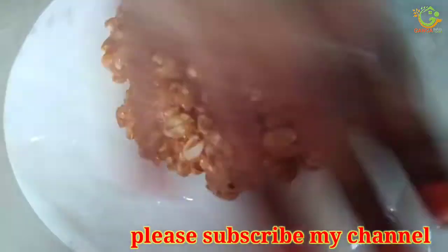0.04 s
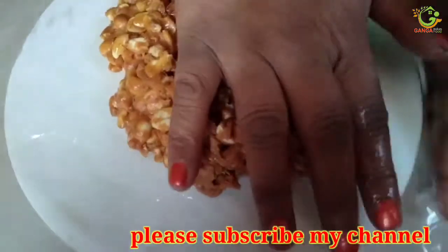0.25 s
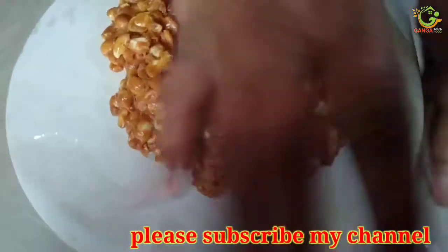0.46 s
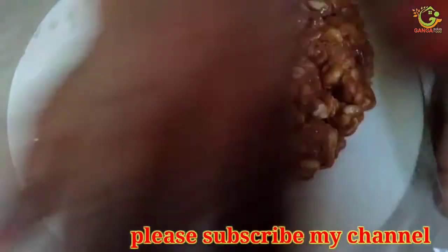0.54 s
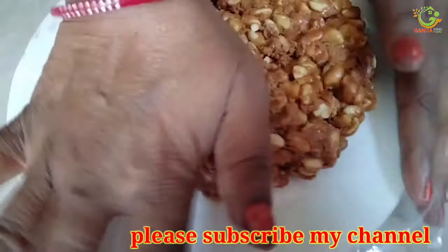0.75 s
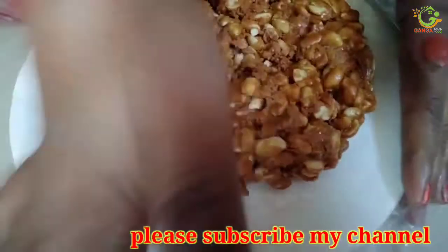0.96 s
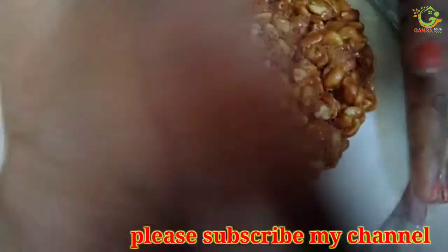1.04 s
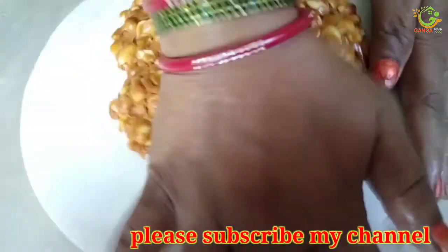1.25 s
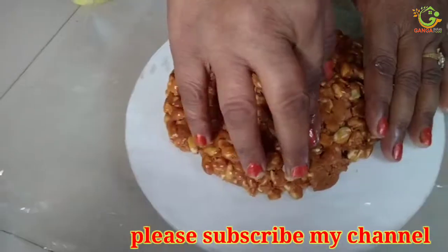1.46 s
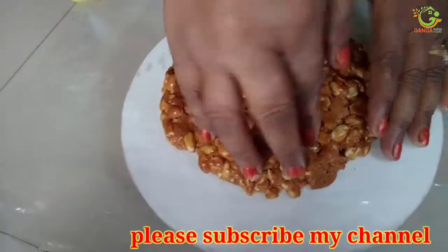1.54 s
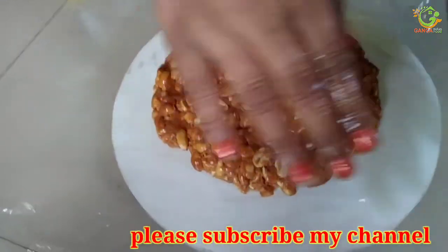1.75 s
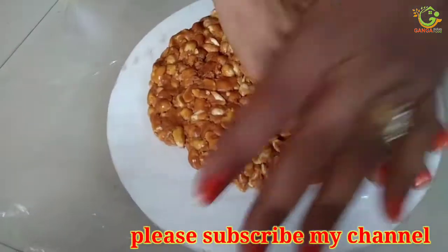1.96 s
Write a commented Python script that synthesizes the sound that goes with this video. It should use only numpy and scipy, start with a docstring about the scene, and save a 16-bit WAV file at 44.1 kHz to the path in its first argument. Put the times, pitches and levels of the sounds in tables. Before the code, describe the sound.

A sticky mass of peanuts and sugar crackles as hands press it flat several times. Bangles click midway, then the plate knocks dully twice as the presses soften. The microphone is close, in a small kitchen with low hum.

```python
"""Pressing peanuts and sugar

Close microphone on a plate in a small kitchen, where hands press a warm mass of peanuts and sticky sugar flat.
Each press crackles as sugar threads snap and skin peels off; a nut cracks, bangles click and the plate knocks
dully on the counter twice. Behind them lie air and hiss, with a low hum and rumble; the background drops
suddenly near 1.5 s, and the last pats are quieter."""
import sys
import numpy as np
from scipy import signal
from scipy.fft import rfft, irfft
from scipy.io import wavfile

SR = 44100
rng = np.random.default_rng(int(sys.argv[2]) if len(sys.argv) > 2 else 0)


def store_pcm(level_fs):
    """Save levels as 16-bit WAV."""
    pcm = np.round(np.clip(level_fs, -1, 1) * 32767).astype(np.int16)
    wavfile.write(sys.argv[1], SR, np.atleast_2d(pcm).T)


N = 88200

# sugar threads snapping: start_s, relative_db, treble_db, decay_ms
SUGAR_SNAPS = [(0.165,-29,-14,2.9),(.170,-30.5,-7,1.7),(0.214,-29.5,-18,2.7),(0.25,-22.5,-6,1.8),(0.2547,-18.5,1,4.3),(0.263,-18,-14,2.7),(.267,-13,0.5,2.1),(.2795,-14,-5,3.5),(0.2894,-15.5,-7,3),
               (0.3032,-7.5,-4.5,0.74),(.307,-12.5,-5.5,0.99),(0.32,-18,2,2.5),(0.3424,-20,-1,1.5),(.347,-15,-1,1.7),(0.3607,-13,-7,5.3),(0.3665,-8,3,1.7),(.376,-11.5,2,1.5),
               (.3875,-19,-9,4.5),(0.3946,-23,-5,1.2),(0.417,-22,-4,2.9),(0.437,-20,-14,2.4),(.464,-19.5,-6,3),(0.49,-18.5,0.5,7.4),(0.506,-21.5,-7,0.42),
               (.529,-22.5,2,1.5),(0.534,-21.5,-4,1.2),(0.541,-20.5,0,2.4),(0.5512,-23,-7.5,1.3),(0.6263,-25.5,-15,1.8),(0.6782,-14.5,-1,3.5),(0.6858,-15,-2.5,4.3),
               (0.6991,-22,-27,1.5),(0.7163,-22,-4,1.8),(0.7188,-14,-0.5,1.1),(0.7378,-11,-0.5,4.7),(.747,-17.5,-0.5,1.6),(.7545,-26,-11,1.1),(.763,-35,-5,1.8),(0.7733,-12.5,1,1.6),(.783,-35,2,2.3),(.7895,-21.5,-1,1.2),(0.7931,-10,5,2),
               (0.8165,-18.5,5,4.8),(0.8256,-13.5,1.5,0.85),(0.855,-27,-9,3),(0.9026,-16,6,2),(0.9093,-13,-0.5,8.6),(0.918,-15,1,2),(0.919,-12,3.5,3.1),(.927,-15.5,19,2),(.932,-13.5,5,1.2),
               (0.9444,-19,10,3),(.971,-15,-1,0.91),(0.9754,-18,20,1.3),(0.9893,-18.5,15,1),(0.9969,-17.5,12,1.5),(1,-20,-1,3.2),(1.054,-26.5,-15,1.5),
               (1.209,-25.5,-11.5,6.7),(1.228,-26.5,3,1.3),(1.262,-32.5,5,1.1),(1.3375,-17.5,0,1.4),(1.342,-21,-11,4),(1.349,-9,1.5,1.7),(1.354,-10,6,1.6),(1.36,-7.5,14,2.7),(1.371,-16,12,1.5),
               (1.377,-24,8,1.2),(1.413,-24,6,1.1),(1.4258,-16,5,2.3),(1.433,-16.5,4,1.2),(1.440,-20,11,0.99),(1.451,-13.5,4.5,2),(1.455,-14.5,4.5,1.6),
               (1.5055,-37,-28,0.78),(1.517,-28.5,-4.5,3),(1.533,-38,-17,5.5),(1.548,-31,-7,2.4),(1.598,-34,1,2.5),(1.7544,-27,8.5,1.4),(1.828,-39.5,-4,1.5),(1.893,-42,-11,1.8),(1.935,-45,-12,1.5)]
# tone of breaking sugar: frequency_hz, gain_db
SUGAR_COLOUR = [(100,-27.5),(400,-18),(800,-14.5),(1400,-8.5),(2200,-11),(3200,-28.5),(4000,-16),(4900,-11.5),(6300,-18),(7300,-7),(8300,2.5),(9600,-5.5),(12300,-13.5),(15000,-9.5),(16000,-17)]
# crackle and friction as the palm bears down: time_s, relative_db
PRESS_LEVEL = [(0,-48),(.235,-39),(.27,-25.5),(.38,-26),(.44,-36),(.53,-34),(.6,-48),(.67,-53),(.69,-29),(.75,-25.5),(.84,-43.5),(.895,-41),(.92,-31.5),(1.01,-30),(1.05,-44.5),(1.19,-52),(1.24,-47),(1.33,-41),(1.352,-16.5),(1.40,-38),(1.45,-30.5),(1.481,-42),(1.49,-57),(2,-65)]
# tone of the palm's friction: frequency_hz, gain_db
RUB_COLOUR = [(80,-16.5),(170,-6.5),(300,-1),(480,-10.5),(800,-1),(1400,0.5),(2200,-0.5),(3100,-10.5),(4800,-9),(6500,-12),(12000,1)]
# a finger sliding on the plate: time_s, level_db
SQUEAK_LEVEL = [(1.262,-69),(1.274,-50),(1.305,-48),(1.318,-42),(1.335,-65)]
# the plate knocks and rocks: start_s, relative_db, tilt_db_per_octave
PLATE_KNOCKS = [(1.3843,-15,-3),(1.3856,-18.5,20),(1.712,-15.5,-1),(1.7146,-31.5,13)]
# modes of the loaded plate: pitch_hz, relative_db, t60_s
PLATE_MODES = [(618,-4,0.023),(856,2.5,0.027),(1070,0,0.019),(1378,0,0.026),(1740,-2.5,.015),(1987,-4.5,0.032),(2750,-19.5,0.012),(4140,-19,0.018)]
# a knock coming back off the near walls: delay_s, gain_db
WALL_ECHOES = [(.0165,-5),(.0325,-16),(.05,-25)]
# modes of the cracking nut: pitch_hz, level_db, t60_s
NUT_MODES = [(1730,-27,0.017),(1833,-10.5,0.018),(2215,-13.5,0.019)]
# bangles touching: start_s, level_db, treble_db, decay_ms
BANGLE_CLICKS = [(1.0781,-21,-2.5,1.26),(1.2129,-20,18,1.5),(1.2168,-21,15.5,1.3)]
# tone of a bangle click: frequency_hz, gain_db
CLICK_COLOUR = [(200,-31),(1000,-26),(2200,-2.5),(3200,-36),(4800,-21.5),(6400,-18),(7600,3.5),(9200,-3.5),(12000,-10),(15000,-7.5),(16000,-6.5)]
# kitchen air, sinking away: time_s, level_db
ROOM_AIR_LEVEL = [(0,-38.5),(.4,-37),(.8,-40.5),(1.15,-42.5),(1.47,-43.5),(1.495,-52),(1.75,-48),(2,-53)]
# tone of the air: frequency_hz, gain_db
ROOM_AIR_COLOUR = [(100,-4.5),(150,12.5),(200,2),(260,2),(480,-4.5),(800,-2),(1300,-4),(2100,-1.5),(2900,-12.5),(3700,-15),(5000,-18),(8300,-21),(15500,-53)]
# treble hiss, swelling and fading: time_s, level_db
TREBLE_HISS_LEVEL = [(0,-47.5),(.2,-59),(.6,-46),(1.15,-56),(1.3,-45.5),(1.47,-30),(1.495,-60),(1.7,-55),(2,-57.5)]
# tone of the hiss: frequency_hz, gain_db
TREBLE_HISS_COLOUR = [(2500,-28),(3700,-30),(5000,3.5),(6500,-7),(8300,9.5),(10500,-0.5),(13000,-16),(15500,-1)]
# steady low room tone: frequency_hz, gain_db
ROOM_TONE_COLOUR = [(70,-38.5),(110,-4),(150,0.5),(200,-4.5),(320,-3),(500,-20.5),(1000,-59),(4000,-98)]
# low rumble, dropping near 1.5 s: time_s, level_db
LOW_RUMBLE_LEVEL = [(0,-32),(.25,-34.5),(.45,-38),(.7,-33.5),(.9,-40.5),(1.1,-39),(1.22,-42),(1.47,-36),(1.495,-53.5),(2,-53.5)]
# tone of the rumble: frequency_hz, gain_db
LOW_RUMBLE_COLOUR = [(10,-2),(16,8.5),(30,-7),(50,5.5),(70,-3.5),(95,-14),(145,-8.5),(200,-16),(300,-29.5),(600,-46.5)]
# tones of a humming appliance: pitch_hz, relative_db
APPLIANCE_TONES = [(63,-2.5),(210.5,-8.5)]
# rise and fall of the hum: time_s, level_db
APPLIANCE_LEVEL = [(0,-39),(.26,-32.5),(.4,-39),(.7,-35.5),(1.1,-45),(1.45,-51),(1.52,-65),(2,-50.5)]

SNAP_DB, GRAIN_DB, RUB_DB, BANGLE_TAIL_DB, ROOM_TONE_DB = -12.5, -3, -6.5, -8, -53
CRACKLE_ROOM_DB, KNOCK_ROOM_DB, NUT_ROOM_DB = -9.5, -7, -8
CRACKLE_T60_S, ROOM_T60_S, BANGLE_T60_S = 0.23, 0.35, 0.26
SNAP_BODY_LOSS, BANGLE_BODY_LOSS = 0.47, 0.54  # dB of body lost per dB of treble lift
BODY_FADE_HZ, TREBLE_RISE_HZ = (2420, 6600), (7300, 11600)


def sugar_snaps():
    """Each snap is an avalanche of tiny ruptures; the brighter it is, the less body it has."""
    out = np.zeros(N)
    for start_s, db, treble_db, decay_ms in SUGAR_SNAPS:
        tone = thinned(SUGAR_COLOUR, SNAP_BODY_LOSS * treble_db)
        snap = unit_rms(colour(avalanche(decay_ms), tone, treble_db))
        add(out, start_s, from_db(db + SNAP_DB) * snap)
    return out


def fine_crackle(grains_per_s=3500):
    """Countless small sugar threads part while the hand bears down."""
    grains = impulses(N, max_db=15) * (rng.random(N) < grains_per_s / SR)
    return from_db(GRAIN_DB) * level(PRESS_LEVEL) * unit_rms(colour(grains, SUGAR_COLOUR, treble_db=-8))


def palm_rub():
    """Friction of the palm, following the pressure."""
    return from_db(RUB_DB) * level(PRESS_LEVEL) * noise(RUB_COLOUR)


def plate_knocks(low_hz=462, high_hz=2740, echo_band_hz=(720, 970)):
    """The loaded plate bumps the counter; its damped ring comes back from the walls."""
    direct, t = np.zeros(N), np.arange(SR // 4) / SR
    pivot_hz = PLATE_MODES[3][0]
    for start_s, db, tilt_db in PLATE_KNOCKS:
        for k, (hz, mode_db, t60_s) in enumerate(PLATE_MODES):
            envelope_db = db + mode_db + tilt_db * np.log2(hz / pivot_hz) - 60 * t / t60_s
            add(direct, start_s, (-1) ** k * from_db(envelope_db) * np.sin(2 * np.pi * hz * t))
    direct = cut(direct, low_hz, "high", order=4)
    direct = cut(direct, high_hz, "low", order=5)
    out = direct + from_db(KNOCK_ROOM_DB) * room(direct, ROOM_T60_S)
    echo = cut(direct, echo_band_hz, "band", order=1)
    for delay_s, db in WALL_ECHOES:
        add(out, delay_s, from_db(db) * echo)
    return out


def nut_crack(start_s=0.915, low_hz=1000):
    """A nut gives under the heel of the hand with one short, woody ring."""
    direct, t = np.zeros(N), np.arange(SR // 10) / SR
    for hz, db, t60_s in NUT_MODES:
        add(direct, start_s, from_db(db - 60 * t / t60_s) * np.sin(2 * np.pi * hz * t))
    direct = cut(direct, low_hz, "high")
    return direct + from_db(NUT_ROOM_DB) * room(direct, ROOM_T60_S)


def bangles():
    """Bangles touch in thin, bright clicks with a smooth, airy tail."""
    out, t = np.zeros(N), np.arange(SR // 3) / SR
    for start_s, db, treble_db, decay_ms in BANGLE_CLICKS:
        tone = thinned(CLICK_COLOUR, BANGLE_BODY_LOSS * treble_db)
        click = unit_rms(colour(avalanche(decay_ms), tone, treble_db))
        tail = unit_rms(colour(rng.standard_normal(len(t)), CLICK_COLOUR, treble_db))
        add(out, start_s, from_db(db) * click)
        add(out, start_s, from_db(db + BANGLE_TAIL_DB - 60 * t / BANGLE_T60_S) * tail)
    return out


def finger_squeak(pitch_hz=5020, flutter_hz=78):
    """Skin slides on the plate with a faint, thin, fluttering tone."""
    t = np.arange(N) / SR
    sliding = (t > SQUEAK_LEVEL[0][0]) & (t < SQUEAK_LEVEL[-1][0])
    squeak = unit_rms(waver(flutter_hz) * np.sin(2 * np.pi * pitch_hz * t))
    return level(SQUEAK_LEVEL) * sliding * squeak


def room_air():
    """The kitchen behind the plate: soft air, treble hiss and a steady low tone."""
    air = level(ROOM_AIR_LEVEL) * noise(ROOM_AIR_COLOUR)
    hiss = level(TREBLE_HISS_LEVEL) * noise(TREBLE_HISS_COLOUR)
    return air + hiss + from_db(ROOM_TONE_DB) * noise(ROOM_TONE_COLOUR)


def appliance_hum(waver_db=0.5, waver_hz=24):
    """An appliance hums on two low tones, each wavering slightly in level."""
    hum, t = np.zeros(N), np.arange(N) / SR
    for hz, db in APPLIANCE_TONES:
        gain = from_db(db + waver_db * waver(waver_hz))
        hum += gain * np.sin(2 * np.pi * (hz * t + rng.random()))
    return np.sqrt(2) * level(APPLIANCE_LEVEL) * hum


def rumble():
    """Deep noise that drops abruptly near 1.5 s."""
    return level(LOW_RUMBLE_LEVEL) * noise(LOW_RUMBLE_COLOUR)


def room(x, t60_s, build_s=0.0067):
    """Diffuse reflections of the small kitchen build up and die away."""
    t = np.arange(SR // 2) / SR
    tail = rng.standard_normal(len(t)) * from_db(-60 * t / t60_s) * (1 - np.exp(-t / build_s))
    return signal.fftconvolve(x, tail / np.linalg.norm(tail))[:N]


def avalanche(decay_ms, samples=1536):
    """Tiny impulses that swell and die within milliseconds."""
    ms = 1000 * np.arange(samples) / SR
    rise_ms = 0.4 * decay_ms
    return impulses(samples, max_db=12) * (1 - np.exp(-ms / rise_ms)) * np.exp(-ms / decay_ms)


def impulses(count, max_db, spread_db=3):
    """Impulses of either sign, mostly small with a few large ones."""
    return rng.choice([-1, 1], count) * from_db(np.minimum(rng.exponential(spread_db, count), max_db))


def thinned(points, loss_db):
    """A colour with less low body."""
    return [(hz, db - loss_db * np.interp(hz, BODY_FADE_HZ, [1, 0])) for hz, db in points]


def colour(x, points, treble_db=0):
    """Minimum-phase filter through frequency_hz, gain_db points, with a treble shelf."""
    n = 2 * len(x)
    bins_hz = np.maximum(np.arange(n // 2 + 1) * SR / n, 1)
    hz, db = np.transpose(points)
    curve_db = np.interp(np.log(bins_hz), np.log(hz), db)
    shelf_db = treble_db * np.interp(bins_hz, TREBLE_RISE_HZ, [0, 1])
    cepstrum = irfft(np.log(from_db(curve_db + shelf_db)))
    # fold onto positive time, so nothing rings ahead of a click
    cepstrum[1:n // 2] *= 2
    cepstrum[n // 2 + 1:] = 0
    return irfft(rfft(x, n) * np.exp(rfft(cepstrum)))[:len(x)]


def noise(points):
    """Smooth noise of a given colour, rms 1."""
    return unit_rms(colour(rng.standard_normal(N), points))


def waver(hz):
    """Random motion slower than about hz, rms 1."""
    return unit_rms(cut(rng.standard_normal(N), hz, "low"))


def cut(x, hz, kind, order=2):
    """Butterworth filter."""
    return signal.sosfilt(signal.butter(order, hz, kind, fs=SR, output="sos"), x)


def level(rows):
    """Gain over time from time_s, level_db rows."""
    return from_db(np.interp(np.arange(N) / SR, *np.transpose(rows)))


def add(out, start_s, sound):
    """Mix a sound in at a time."""
    i = int(np.clip(start_s * SR, 0, N - 1))
    out[i:i + len(sound)] += sound[:N - i]


def from_db(db):
    """Decibels to gain."""
    return 10 ** (np.asarray(db) / 20)


def unit_rms(x):
    """Scale to rms 1."""
    return x / np.sqrt(np.mean(x ** 2) + 1e-20)


def scene():
    """Hands and plate up close, the kitchen behind, in mono."""
    crackle = sugar_snaps() + fine_crackle() + finger_squeak() + palm_rub()
    reflections = from_db(CRACKLE_ROOM_DB) * room(crackle, CRACKLE_T60_S)
    impacts = bangles() + nut_crack() + plate_knocks()
    background = room_air() + appliance_hum() + rumble()
    return (crackle + reflections + impacts + background)[None]


def record(dry, clip_level=1.3, cutoff_hz=15650):
    """The close microphone clips the highest peaks and loses the top treble."""
    lowpass = signal.ellip(10, 0.1, 80, cutoff_hz, fs=SR, output="sos")
    return signal.sosfilt(lowpass, np.clip(dry, -clip_level, clip_level))


dry = scene()
out = record(dry)
store_pcm(out)
```